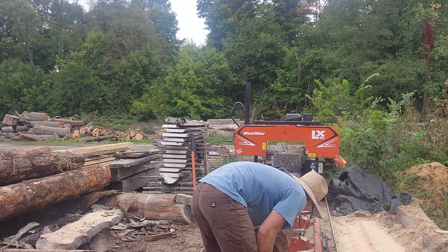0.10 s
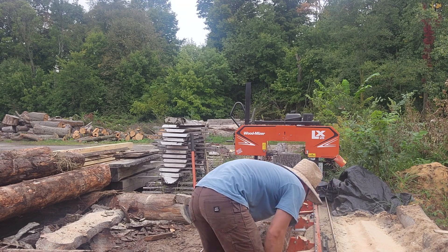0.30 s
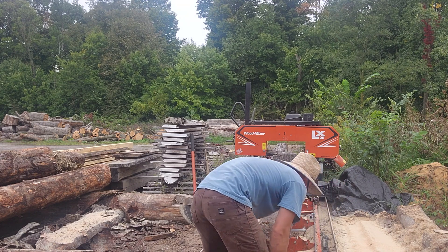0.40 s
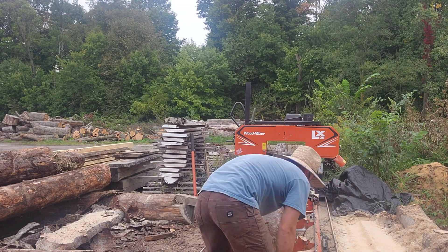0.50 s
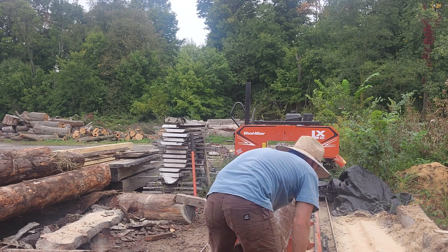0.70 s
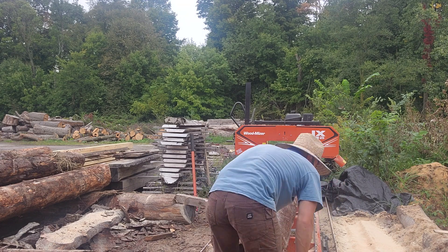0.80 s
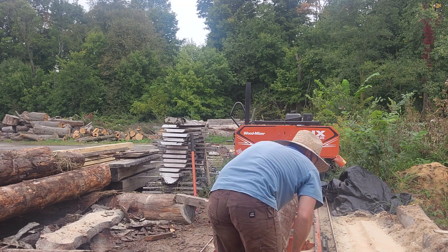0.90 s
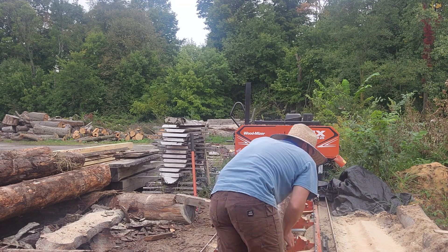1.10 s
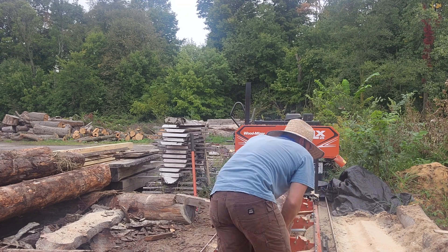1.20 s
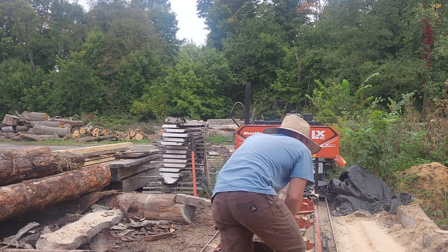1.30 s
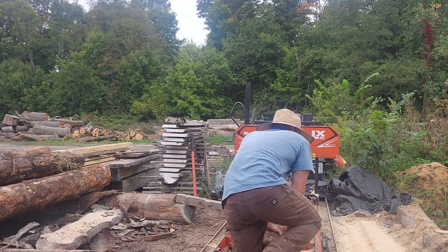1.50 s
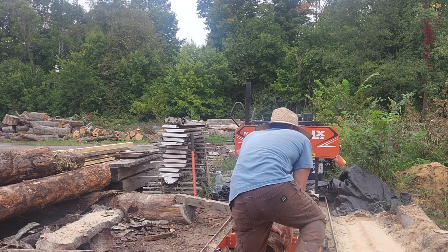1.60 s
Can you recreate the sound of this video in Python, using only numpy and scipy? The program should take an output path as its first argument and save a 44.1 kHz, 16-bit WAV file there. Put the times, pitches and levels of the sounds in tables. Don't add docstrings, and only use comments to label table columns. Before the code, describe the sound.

One big low log thud on a steel bed comes almost at once, with short clatter and grit, then quiet footwork in sawdust; crickets and a thin bird whistle surround it outdoors, dry and open.

```python
import sys
import numpy as np
from scipy import signal
from scipy.io import wavfile

SR = 44100
rng = np.random.default_rng(int(sys.argv[2]) if len(sys.argv) > 2 else 0)


def field_ratio(decibels):
    return 10 ** (np.asarray(decibels, dtype=float) / 20)


def wrap_up_sound(samples):
    columns = np.atleast_2d(samples).T
    tamed = np.clip(columns, -1, 1)
    steps = np.round(tamed * 32767).astype(np.int16)
    wavfile.write(sys.argv[1], SR, steps)


N = 70560
T = np.arange(N) / SR
THUMP_S = .201
MIC_LOW_HZ = 39


def rms_one(x):
    return x / np.sqrt(np.mean(x ** 2) + 1e-20)


def at_hz(points, hz):
    pitches, values = np.array(points)[:, 0], np.array(points)[:, 1]
    return np.interp(np.log(hz), np.log(pitches), values)


def low_pass(x, hz, order=2):
    return signal.sosfilt(signal.butter(order, hz, fs=SR, output="sos"), x)


def high_pass(x, hz, order=2):
    return signal.sosfilt(signal.butter(order, hz, "high", fs=SR, output="sos"), x)


def band_pass(x, edges, order=2):
    return signal.sosfilt(signal.butter(order, edges, "band", fs=SR, output="sos"), x)


def drift(rate):
    r = np.exp(-80 * np.pi * rate / SR)
    noise = rng.standard_normal(N // 40 + 2002)
    slow = signal.lfilter([1], [1, -2 * r, r * r], noise)[2000:]
    return np.interp(np.arange(N) / 40, np.arange(len(slow)), rms_one(slow))


def ring(clicks, hz, t60):
    r, w = field_ratio(-60 / (t60 * SR)), 2 * np.pi * hz / SR
    return signal.lfilter([0, np.sin(w)], [1, -2 * r * np.cos(w), r * r], clicks + 1e-18)


def tone(hz, wobble=0):
    return np.sin(2 * np.pi * hz * T + wobble)


def pan(left_db):
    return field_ratio(np.array([[left_db / 2], [-left_db / 2]]))


def swell(start, rise, t60):
    t = np.maximum(T - start, 0)
    return (1 - np.exp(-t / rise)) ** 2 * field_ratio(-60 * t / t60)


def hump(start, length):
    return np.sin(np.pi * np.clip((T - start) / length, 0, 1) ** 0.56) ** 2


def bands(spectrum, patchy_db, shape=lambda hz: 1, per_octave=3):
    # (pitch [Hz], likeness [-1 to 1])
    likeness = [(60, 0.96), (180, 0.97), (550, 0.31), (1650, -0.15), (4970, 0.077), (15000, -0.27)]
    low, high = spectrum[0][0], spectrum[-1][0]
    edges = np.geomspace(low, high, int(per_octave * np.log2(high / low)) + 3)
    white = rng.standard_normal((2, 2, N + 4096))
    out, power = 0, 0
    for k, (a, b) in enumerate(zip(edges, edges[1:])):
        mid, side = band_pass(white[k % 2], [a, b])[:, 4096:]
        hz = np.sqrt(a * b)
        alike = np.clip(at_hz(likeness, hz), -1, 1)
        power += field_ratio(2 * at_hz(spectrum, hz)) * (b - a) * 4 / SR
        gain = field_ratio(at_hz(spectrum, hz) + patchy_db * drift(6.6)) * shape(hz)
        out = out + gain * (np.sqrt(1 + alike) * mid + np.sqrt(1 - alike) * side * [[1], [-1]])
    return out / np.sqrt(power)


def frame_freedom():
    # (time [s], level [dB])
    frame_free = [
        (.2, -0.5),
        (.385, -1),
        (.41, -21.5),
        (.428, -1.5),
        (.5, -6.5),
        (.56, -3.5),
        (.675, -0.5),
        (.7, -12),
        (.8, -14),
    ]
    return field_ratio(np.interp(T, *np.transpose(frame_free)))


def ground_wave():
    start_hz, end_hz, sink_s = 200, 54, .0051
    dip_s, rise_s = .2032, .0045
    t = T - dip_s
    turns = end_hz * t + (start_hz - end_hz) * sink_s * np.tanh(t / sink_s)
    fade = swell(THUMP_S, rise_s, .037) + field_ratio(-27) * swell(THUMP_S, 2 * rise_s, .4)
    return -field_ratio(6.5) * low_pass(fade * np.cos(2 * np.pi * turns), 450)


def log_and_frame(free):
    # (pitch [Hz], level [dB], t60 [s])
    log_tones = [(55.81, -39.5, 1.03), (64.7, -60, 0.24), (85.7, -34, 0.17), (123, -66, 0.35),
                 (206.2, -26, 0.27), (218.6, -38.5, 0.77), (254, -51.5, 0.75), (286.4, -39.5, 0.46),
                 (340.9, -37, 0.38), (422.6, -37, 0.27), (577, -49.5, 0.16)]
    # (time [s], push on frame [dB], push on timber [dB])
    bounces = [(.19, -22.5, -16.5), (.21, -26, -2), (0.226, -2.5, -13), (0.263, 7.5, -16),
               (.297, -16, -19.5), (0.333, -9.5, -23.5), (0.428, -11, -37.5), (.482, -15, -37),
               (0.519, -5.5, -35.5), (.592, -20, -48), (0.625, -15, -41)]
    frame_top_hz = 150
    frame_push, timber_push = np.zeros(N), np.zeros(N)
    for s, frame_db, timber_db in bounces:
        frame_push[int(s * SR)] = field_ratio(frame_db)
        timber_push[int(s * SR)] = field_ratio(timber_db)
    body = 0
    for hz, db, t60 in log_tones:
        if hz > frame_top_hz:
            body = body + field_ratio(db) * ring(timber_push, hz, t60)
        else:
            body = body + field_ratio(db) * ring(frame_push, hz, t60) * free
    return signal.lfilter([.05], [1, -.95], body)


def shudder(free):
    # (pitch [Hz], level per Hz [dB])
    shudder_color = [(21, -34), (42, 0.5), (99, -0.5), (291, -17.5), (583, -34), (981, -29.5),
                     (1100, -25.5), (1750, -46.5), (3500, -48), (4550, -91.5), (7700, -120)]
    # (pitch [Hz], t60 [s])
    shudder_t60 = [(50, 1), (120, 0.47), (300, 0.33), (1000, 0.42), (3000, 0.48)]
    shake = bands(shudder_color, 5.24, lambda hz: swell(THUMP_S, 0.0023 + 0.28 / hz, at_hz(shudder_t60, hz)))
    return high_pass(field_ratio(-27) * shake * free, MIC_LOW_HZ)


def thump():
    free = frame_freedom()
    return ground_wave() + log_and_frame(free) + shudder(free)


def rails():
    # (pitch [Hz], level [dB], t60 [s])
    rail_tones = [(777, -16, .04), (950, -18.5, 0.025), (1090, -8.5, 0.046), (1166, -16.5, 0.18),
                  (1280, -7, 0.016), (1403, -22.5, 0.068), (1573, -20.5, 0.11), (2010, -19, 0.034),
                  (2310, -25, 0.028), (2950, -17.5, 0.032), (3320, -14.5, 0.013)]
    # (time [s], level [dB], chatter length [s], hardness [Hz])
    clanks = [
        (0.199, -52, .012, 6000),
        (0.223, -56.5, .012, 6000),
        (0.237, -55.5, .02, 9400),
        (0.268, -57.5, .008, 1500),
        (0.281, -44.5, .004, 4330),
        (0.295, -51, .01, 1500),
        (0.313, -63, .02, 1200),
        (0.446, -77, .24, 2500),
        (1.484, -60, 0.061, 2500),
    ]
    touch = rng.random(N) < 1100 / SR
    out = 0
    for hz, db, t60 in rail_tones:
        clicks = 0
        for s, hit_db, length, hard_hz in clanks:
            chatter = touch * (T > s) * (T < s + length)
            first = np.arange(N) == int(s * SR)
            clicks = clicks + field_ratio(hit_db) / (1 + (hz / hard_hz) ** 2) * (chatter + first)
        struck = clicks * rng.standard_normal(N)
        out = out + field_ratio(db) * ring(struck, hz, t60) * pan(rng.normal(0, 5.6))
    return out


def clamp():
    hz = 1105
    fade = 10 * field_ratio(-33.5) * swell(.28, .01, .035)
    return fade * (tone(hz) + 0.27 * tone(1.3 * hz)) * pan(-0.54)


def pings():
    # (time [s], pitch [Hz], level [dB], t60 [s])
    ping_list = [(0.205, 3700, -50.5, 0.042), (.2285, 5560, -47, 0.04), (0.232, 1330, -47.5, 0.048),
                 (0.243, 1408, -48, 0.067), (0.296, 1283, -45.5, 0.05), (.236, 5150, -46, 0.03),
                 (0.2453, 5100, -48, 0.046), (0.2817, 2580, -54, 0.056), (.473, 1150, -71, 0.15),
                 (0.49, 1170, -83, 0.064), (0.514, 1200, -65, 0.067), (0.559, 2000, -69, 0.043),
                 (.579, 1500, -69, 0.1), (.61, 1110, -71, 0.18), (.657, 1060, -71, 0.1),
                 (1.5, 1180, -60, 0.17), (1.512, 1100, -65, 0.1), (1.527, 1390, -63, 0.18)]
    out = 0
    for s, hz, db, t60 in ping_list:
        out = out + field_ratio(db + 4) * swell(s, 0.0036, t60) * tone(hz) * pan(rng.normal(-0.66, 3))
    return out


def cracks():
    # (time [s], level [dB], top pitch [Hz])
    crack_list = [(.2035, -55, 6000), (0.2055, -62.5, 11900), (.2195, -69, 13000), (.2275, -67, 14000),
                  (.241, -71, 9950), (0.255, -77, 9300), (0.277, -59, 7000), (0.286, -56, 4500),
                  (.296, -54.5, 4500), (.332, -67.5, 3500), (1.303, -67, 3100), (1.515, -63, 3500)]
    snap = rng.standard_normal(N) + 0.32 * rng.standard_normal((2, N))
    out = 0
    for s, db, top_hz in crack_list:
        out = out + field_ratio(db) * swell(s, 0.00065, 0.038) * band_pass(snap, [1500, top_hz])
    return out


def grit():
    # (pitch [Hz], level per Hz [dB])
    grit_color = [(2500, -35), (4560, 8.5), (5400, 4), (7500, -2), (10000, -9.5), (13600, -28),
                  (15000, -18), (15500, -3), (17000, 6)]
    grains = field_ratio(-42.5 + 2 * drift(150))
    return grains * pan(2) * swell(0.192, 0.022, 0.15) * bands(grit_color, 3.7)


def knock():
    # (time [s], level [dB])
    knocks = [
        (0.85, -53.5),
        (.866, -51.5),
        (0.877, -67),
    ]
    # (pitch [Hz], level [dB], t60 [s])
    plank_tones = [(223, 1.5, 0.099), (344, -6, 0.13), (411.3, 3.5, 0.14), (578, -11.5, 0.088)]
    blows = np.zeros(N)
    for s, db in knocks:
        blows[int(s * SR)] = field_ratio(db)
    plank = sum(field_ratio(db) * ring(blows, hz, t60) for hz, db, t60 in plank_tones)
    return signal.lfilter([.06], [1, -.94], plank)


def scuffs():
    # (time [s], length [s], level [dB], centre pitch [Hz])
    scuff_list = [
        (0.58, 0.12, -84, 1080),
        (0.857, 0.045, -64, 400),
        (0.949, 0.11, -74, 1470),
        (0.995, 0.12, -72, 1170),
        (1.181, 0.096, -74, 1290),
        (1.298, 0.033, -68.5, 1500),
        (0.905, 0.48, -69.5, 366),
        (1.344, 0.092, -71.5, 1320),
        (1.467, 0.11, -69, 1160),
    ]
    octaves = 0.69
    near = rng.standard_normal(N)
    rub = (1.3 * near + 0.79 * rng.standard_normal((2, N))) * field_ratio(2 * drift(77))
    dust = rms_one(band_pass(rub, [1500, 9000], 1))
    out = 0
    for s, length, db, hz in scuff_list:
        edges = hz * 2 ** (np.array([-.5, .5]) * octaves)
        body = rms_one(band_pass(rub, edges))
        out = out + field_ratio(db) * hump(s, length) * (body + field_ratio(-30.5) * dust)
    return out


def rustle():
    # (time [s], level [dB])
    movement = [(0.0, -86), (0.186, -73), (0.328, -73), (0.41, -74), (0.52, -77.5), (0.6, -73.5),
                (0.665, -69.5), (0.7, -81.5), (0.9, -82), (1.381, -78), (1.518, -70.5), (1.6, -73.5)]
    # (pitch [Hz], level per Hz [dB])
    rustle_color = [(300, 1), (600, -8.5), (1150, -8), (1600, -6), (2500, -14), (3100, -21), (3900, -9),
                    (6500, -12), (8000, -26), (9500, -27.5), (16300, -36.5)]
    s, db = np.transpose(movement)
    return field_ratio(np.interp(T, s, db) + 4 + 2.2 * drift(28)) * bands(rustle_color, 3.5)


def triller():
    pulses_per_s, start_s = 55.2, .0057
    strokes = np.maximum(np.sin(2 * np.pi * pulses_per_s * (T - start_s)) + 0.26, 0)
    return strokes * field_ratio(-71 + 0.74 * drift(1)) * tone(4312, 0.75 * drift(33)) * pan(5.1)


def chirper():
    # (time [s], level [dB])
    chirps = [
        (.474, -67),
        (1.346, -63),
        (1.4745, -64),
    ]
    pulse_s = 0.0208
    pulses = 0
    for s, db in chirps:
        for k in range(4):
            pulses = pulses + field_ratio(db) * hump(s + k * pulse_s, .8 * pulse_s)
    return pulses * tone(4180) * pan(0.79)


def katydid():
    start_s, gap_s, length_s = .036, .0852, .02
    ticks = sum(hump(start_s + k * gap_s, length_s) * field_ratio(-91 + rng.normal(0, 1.1)) for k in range(19))
    return ticks * tone(11400, 0.91 * drift(60)) * pan(8)


def bird():
    # (time [s], pitch [Hz], level [dB])
    whistles = [
        [(0.0, 8400, -71), (0.028, 8282, -72), (0.05, 8200, -85)],
        [(0.07, 8440, -80.5), (0.134, 8640, -65.5), (0.2, 8400, -74)],
        [(0.775, 7830, -107), (0.789, 8200, -85), (0.85, 8000, -101)],
        [(1.28, 9170, -90), (1.35, 8619, -69), (1.41, 8400, -73.5)],
        [(1.44, 8400, -82), (1.488, 8480, -67), (1.6, 8400, -88)],
    ]
    out = 0
    for rows in whistles:
        s, hz, db = np.transpose(rows)
        edge = np.clip(np.minimum(T - s[0] + .001, s[-1] - T) / .012, 0, 1)
        turns = np.cumsum(np.interp(T, s, hz) + 45 * drift(90)) / SR
        level = field_ratio(np.interp(T, s, db) - 3.5 + 4 * drift(75))
        out = out + edge * level * np.sin(2 * np.pi * turns)
    return out * pan(-10)


def chorus():
    # (pitch [Hz], level per Hz [dB])
    chorus_color = [(3400, -62), (3600, -47), (3870, -22), (4180, -13), (4350, 11), (4580, -0.5),
                    (4900, 11.5), (5250, 1.5), (5700, 0.5), (6340, 3), (6900, -6.5), (7600, -40)]
    wing_t60_s = .016
    out = 0
    for hz in np.geomspace(4400, 7000, 60):
        hz = hz * rng.uniform(.99, 1.01)
        rate, start, left_db = rng.uniform(40, 80), rng.random(), rng.normal(0, 8)
        strength = np.abs(1 + 0.78 * rng.standard_normal(N))
        clicks = np.diff(np.floor(rate * T + start), prepend=0) * strength
        song = rms_one(ring(ring(clicks, hz, wing_t60_s), hz, wing_t60_s))
        level = np.sqrt(hz) * field_ratio(at_hz(chorus_color, hz) + 0.88 * drift(27))
        out = out + song * level * pan(left_db) * rng.choice([-1, 1], (2, 1))
    blur = field_ratio(-3) * bands(chorus_color, 0.6, per_octave=9)
    return low_pass(field_ratio(-63) * (0.7 * rms_one(out) + blur) * pan(-2.2), 6530, 8)


def yard():
    # (pitch [Hz], level per Hz [dB])
    air_color = [(15, -29), (25, 6.5), (91, 1.5), (150, -5.5), (172, -21), (415, -19.5), (469, -25),
                 (515, -34), (1000, -23.5), (1300, -73), (2200, -120)]
    # (pitch [Hz], level per Hz [dB])
    hiss_color = [(7600, -36.5), (8400, -20), (9300, 3), (10300, -3), (11500, -23), (14500, -2), (16300, 1)]
    air = field_ratio(-56.5) * bands(air_color, 4.2)
    hiss = field_ratio(-87.5) * bands(hiss_color, 1.4) * pan(1.4)
    return high_pass(air + hiss, MIC_LOW_HZ)


def scene():
    mill = thump() * pan(0.84) + rails() + clamp() + pings() + cracks() + grit()
    worker = knock() + scuffs() + rustle()
    animals = triller() + chirper() + katydid() + bird() + chorus()
    return mill + worker + animals + yard()


def roll_off(x):
    return signal.sosfilt(signal.butter(12, 15960, fs=SR, output="sos"), x)


def record(dry):
    cut = signal.sosfilt(signal.cheby2(14, 50, 16050, fs=SR, output="sos"), dry)
    mix = high_pass(cut, 36, 3)
    return roll_off(mix)


dry = scene()
out = record(dry)
wrap_up_sound(out)
```